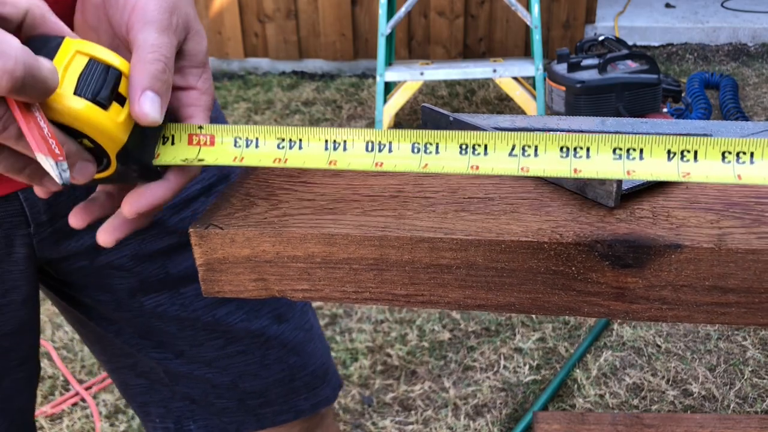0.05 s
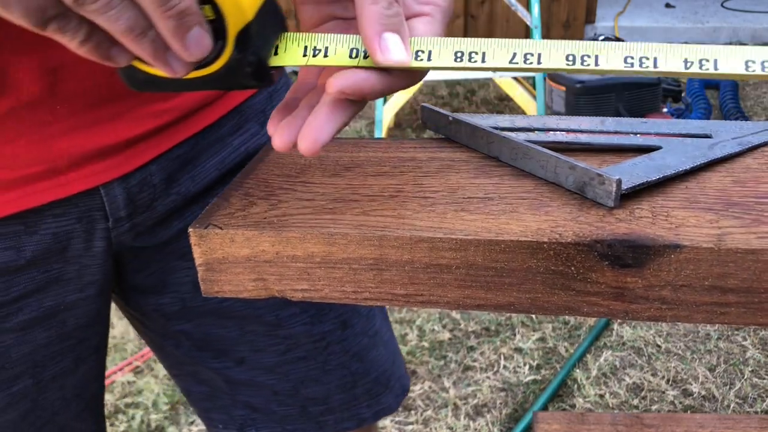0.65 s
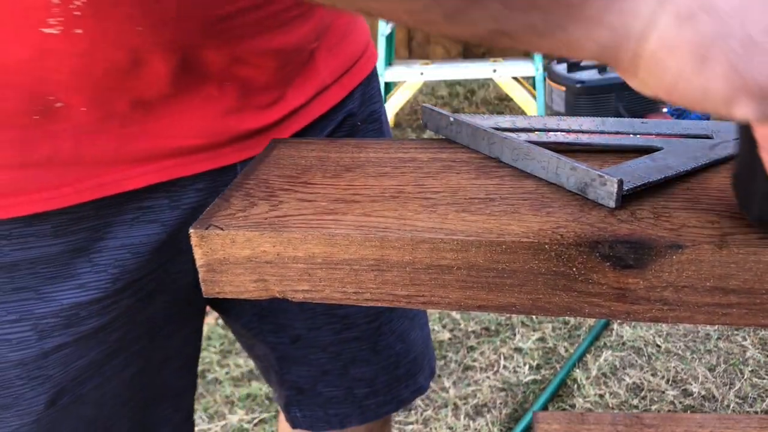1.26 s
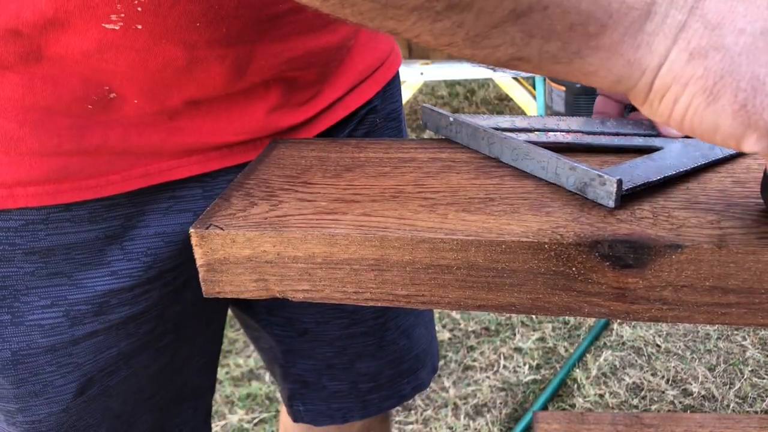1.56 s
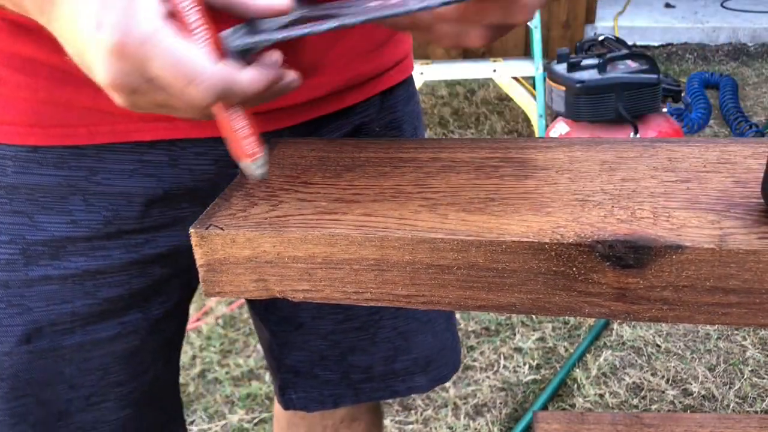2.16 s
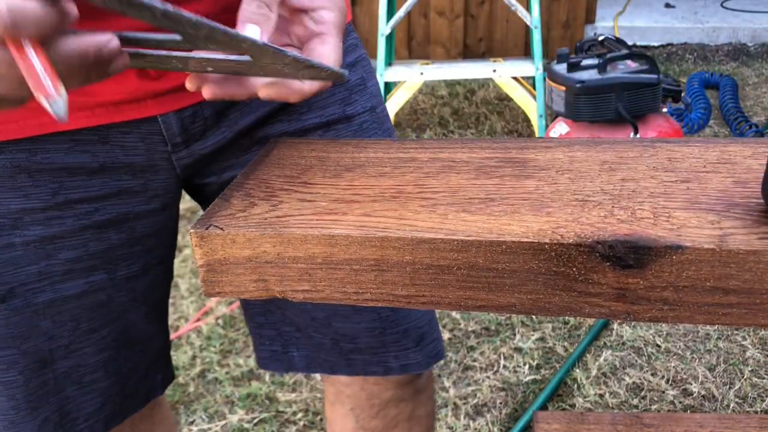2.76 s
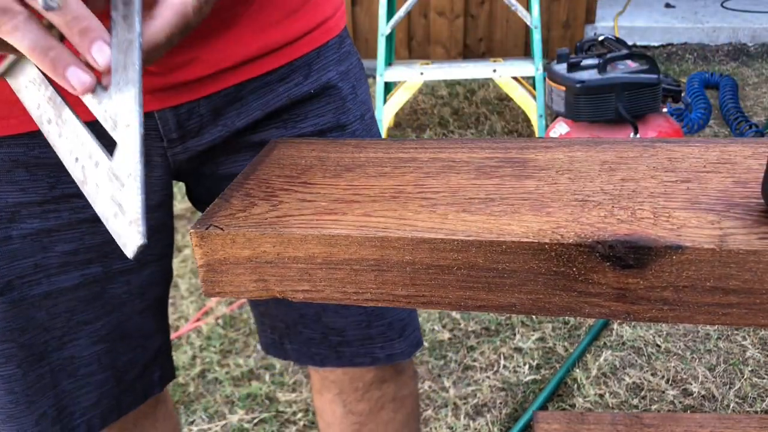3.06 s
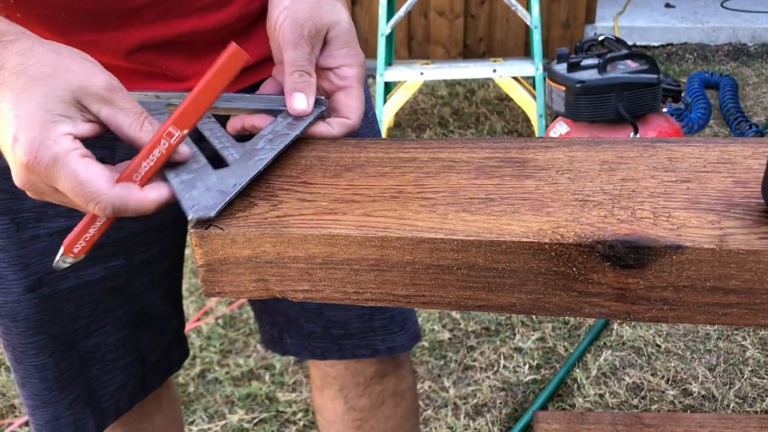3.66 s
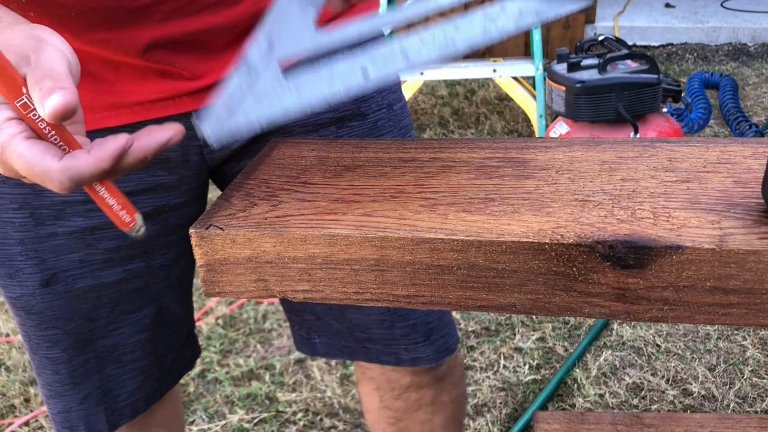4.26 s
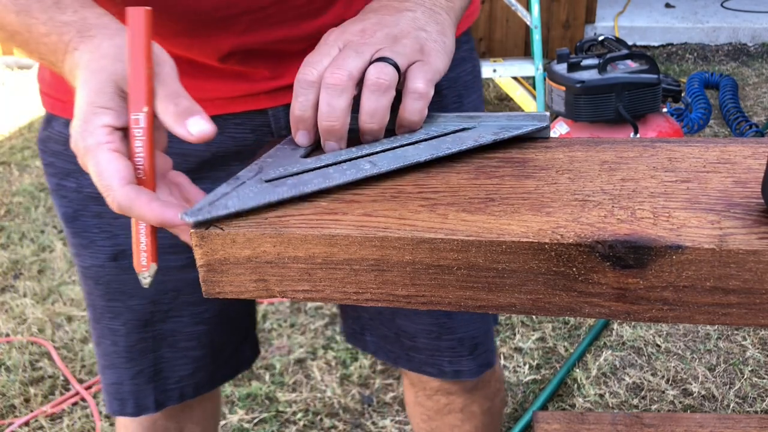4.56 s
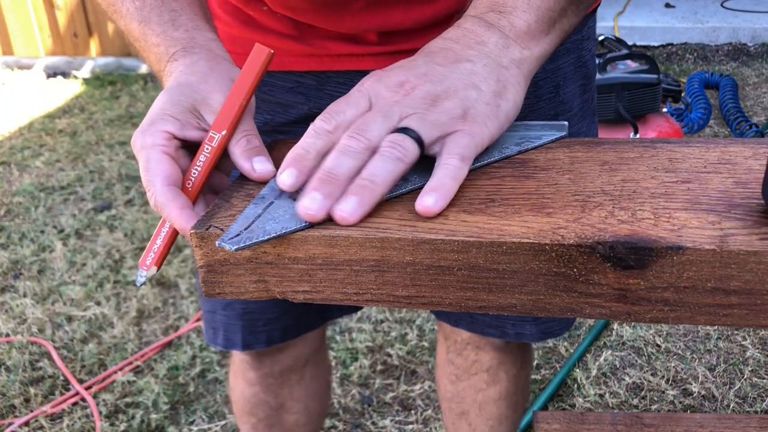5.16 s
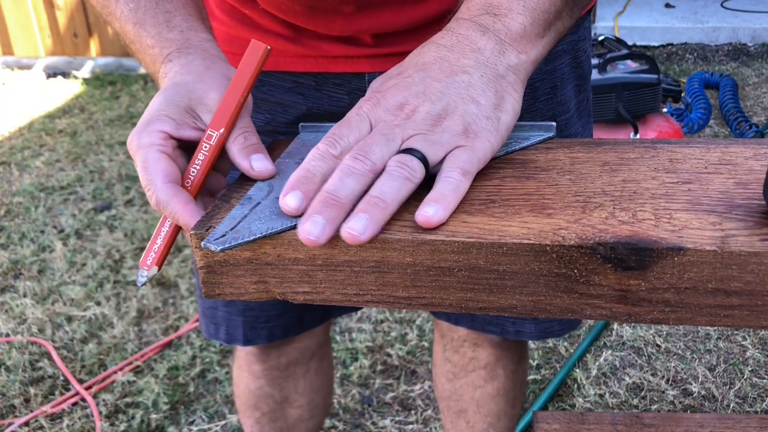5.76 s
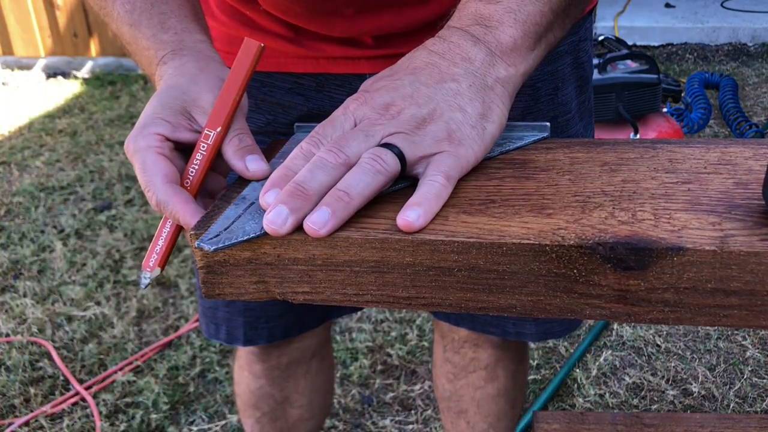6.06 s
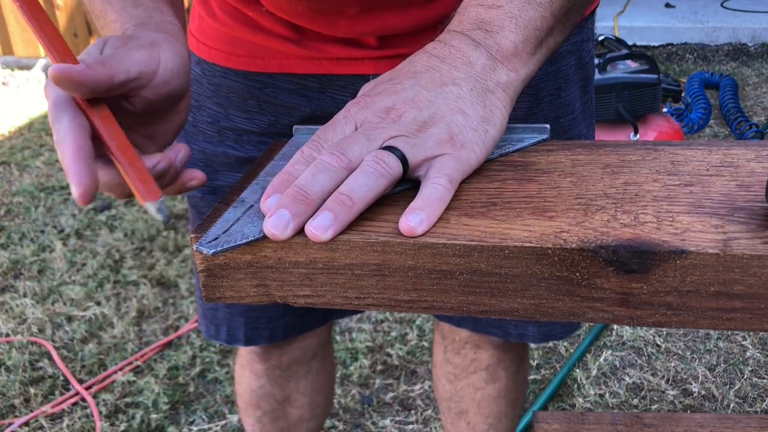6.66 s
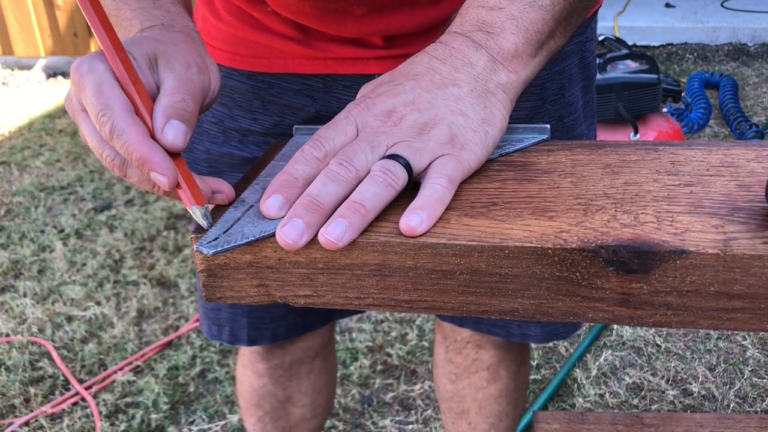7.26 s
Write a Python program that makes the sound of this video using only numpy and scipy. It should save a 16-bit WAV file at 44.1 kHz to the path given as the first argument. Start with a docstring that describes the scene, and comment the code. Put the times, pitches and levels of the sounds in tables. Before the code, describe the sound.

Outdoors in light wind, a tape measure zips back and snaps twice; a metal square is handled and clatters down on wood.

```python
"""A steel tape measure runs back into its case in two pulls, each ending in a clattering stop.
An aluminium square is picked up, rings faintly under the fingers, is dropped on a wooden board
and slid into place. A pencil starts a line. Knocks ring decaying modes; friction is grainy noise.
Outdoors, light wind rocks the microphone over a distant low rumble, and the yard echoes a little."""
import sys
import numpy as np
from scipy import signal
from scipy.fft import rfft, irfft
from scipy.io import wavfile
from scipy.ndimage import uniform_filter1d

SR = 44100
rng = np.random.default_rng(int(sys.argv[2]) if len(sys.argv) > 2 else 0)


def put_to_file(sound):
    """Save the sound as 16-bit audio at rate SR, in the file named by the first command-line argument."""
    columns = np.atleast_2d(sound).T  # one column per channel
    safe = np.clip(columns, -1, 1)
    whole_steps = np.round(safe * 32767)
    wavfile.write(sys.argv[1], SR, whole_steps.astype(np.int16))


N = 331381
TIME = np.arange(N) / SR


def amp(db):
    return 10 ** (np.asarray(db) / 20)


def unit_rms(x):
    return x / np.sqrt(np.mean(x ** 2) + 1e-30)


def log_interp(points, hz):
    """Interpolates (hz, value) points on a log-frequency axis."""
    point_hz, value = np.transpose(points)
    return np.interp(np.log(hz + 0.011), np.log(point_hz), value)


def add(mix, start_s, sound):
    part = mix[round(start_s * SR):][:len(sound)]
    part += sound[:len(part)]


def coloured(x, tone):
    """Filters x by (hz, gain_db) points; rms 1."""
    gain = amp(log_interp(tone, np.fft.rfftfreq(len(x), 1 / SR)))
    return unit_rms(irfft(rfft(x) * gain, len(x)))


def resonate(x, hz, width_hz):
    """Resonance at hz, constant or per sample; rms 1."""
    carrier = np.exp(2j * np.pi * np.cumsum(hz * np.ones(len(x))) / SR)
    pole = np.exp(-np.pi * width_hz / SR)
    return unit_rms((carrier * signal.lfilter([1], np.poly([pole, pole]), x / carrier)).real)


def grains(count, per_s, spread_db):
    """Tiny random slips of uneven size over a fine hiss."""
    slipping = rng.random(count) < per_s / SR
    size = amp(spread_db * np.minimum(rng.exponential(1, count), 4))
    hiss = rng.standard_normal(count)
    return unit_rms(np.sign(hiss) * size * slipping) + 0.44 * hiss


def rub(gain, tone, per_s, spread_db):
    """Friction: grains in a body's colour, following gain."""
    return gain * coloured(grains(N, per_s, spread_db), tone)


def burst(rise_s, t60_s):
    """0.5 s envelope: linear rise, exponential fall."""
    t = TIME[:SR // 2]
    return np.minimum(t / rise_s, 1) * amp(-60 * np.maximum(t - rise_s, 0) / t60_s)


def stroke(start_s, length_s, level_db, swell_db, attack_s, t60_s):
    """Gain of one movement: up 20 dB in the attack_s before start_s, changes by swell_db, decays."""
    t = TIME - start_s
    slope_db = swell_db * (np.clip(t / length_s, 0, 1) - .5)
    edges_db = 20 * np.maximum(-t, 0) / attack_s + 60 * np.maximum(t - length_s, 0) / t60_s
    return amp(level_db + slope_db - np.minimum(edges_db, 200))


def strokes(rows, **shape):
    """Movements summed in power."""
    return np.sqrt(sum(stroke(*row, **shape) ** 2 for row in rows))


def drive_db(hz, focus_hz):
    """A contact drives the modes near focus_hz hardest."""
    return -18 * np.log10(1 + np.log2(hz / focus_hz) ** 2 / 0.47)


def ring(hz, gain_db, t60_s, rise_s):
    """Decaying modes of alternating sign; rms 1 over the first 20 ms."""
    t = TIME[:SR // 2]
    sign = (-1) ** np.arange(len(hz))
    modes = amp(-60 * t / t60_s[:, None]) * np.sin(2 * np.pi * hz[:, None] * t)
    sound = (sign * amp(gain_db)) @ modes
    sound *= 1 - np.exp(-t / rise_s)
    return sound / np.std(sound[:SR // 50])


# wind pressure spectrum: freq_hz, gain_db
WIND_TONE = [(1, -10), (3, -0.5), (8, -2), (15, -32.5), (25, -30.5), (40, -38), (70, -54.5), (150, -78),
             (400, -100)]
# gusts: start_s, length_s, level_db
GUST_STROKES = [(0, 0.46, -24), (1.08, 0.67, -25.5), (2.98, 0.57, -32), (5.8, 0.77, -28.5),
                (6.8, 0.63, -26.5)]

def wind(calm_db=-45):
    """Slow pressure swings on the microphone."""
    pressure = coloured(rng.standard_normal(N), WIND_TONE)
    pressure /= np.sqrt(uniform_filter1d(pressure ** 2, SR // 2))
    gusts = strokes(GUST_STROKES, swell_db=0, attack_s=0.22, t60_s=1.6)
    return np.hypot(amp(calm_db), gusts) * pressure


# rumble and air spectrum: freq_hz, gain_db
RUMBLE_TONE = [(29, -38.5), (50, -5.5), (87, -2), (113, -5), (158, -6.5), (221, -19), (444, -30.5),
               (668, -27.5), (1740, -36.5), (3670, -45.5), (6530, -47.5), (15500, -61)]

def rumble(level_db=-61):
    """Steady distant low noise."""
    return amp(level_db) * coloured(rng.standard_normal(N), RUMBLE_TONE)


# blade runs: start_s, length_s, level_db, swell_db
BLADE_RUNS = [(.02, .04, -70, -3), (.1, 0.86, -82, -1), (.565, 0.096, -53, 11), (.7, 0.24, -75.5, -16),
              (.977, 0.099, -68, -12), (1.06, 0.21, -70, 8.5), (1.25, 0.095, -57, 6),
              (1.34, .15, -57.5, -9)]
# blade friction spectrum: freq_hz, gain_db
BLADE_TONE = [(200, -17), (500, -10), (1000, -3), (1500, -1.5), (2100, -1.5), (2750, -4.5), (4200, -5.5),
              (5300, -6.5), (6700, -8.5), (8300, -22), (15500, -32)]
TAPE_ATTACK_S = 0.026

def blade():
    """The blade hisses over its guide, louder with speed, softer when braked."""
    gain = strokes(BLADE_RUNS, attack_s=TAPE_ATTACK_S, t60_s=0.14)
    return rub(gain, BLADE_TONE, per_s=2000, spread_db=1)


# contacts of case, blade, pencil and square: start_s, level_db, centre_hz, width_oct, t60_s
CLICKS = [(0.036, -58.5, 3020, 1.9, 0.074), (.053, -44, 1910, 0.75, 0.018), (.498, -64, 3900, 0.47, 0.11),
          (0.6502, -29, 5500, 0.55, 0.014), (0.973, -58, 3150, 0.58, 0.062), (1.254, -57, 3000, 0.67, .015),
          (1.272, -56.5, 2300, 0.39, 0.022), (1.326, -51, 8000, 1, .015), (2.351, -58.5, 2300, 1, 0.022),
          (2.592, -57.5, 3750, 0.65, 0.012), (2.7865, -59, 1900, 1, 0.014),
          (4.4913, -44.5, 2670, 0.42, 0.036), (4.556, -38.5, 1890, 0.53, 0.038),
          (4.711, -51.5, 4200, 0.81, 0.01), (5.18, -65, 6670, 0.76, 0.018), (7.176, -72, 2300, 0.68, .02)]

def clicks(rise_s=0.000418):
    """Each contact is a short crack in one broad band."""
    out = np.zeros(N)
    hz = np.geomspace(100, 16000, 30)
    lowpass_db = -10 * np.log10(1 + (hz / 10000) ** 6)
    for start_s, level_db, centre_hz, width_oct, t60_s in CLICKS:
        band_db = -20 * np.log10(1 + (np.log2(hz / centre_hz) / width_oct) ** 2)
        crack = coloured(rng.standard_normal(SR // 2), np.c_[hz, band_db + lowpass_db])
        add(out, start_s, amp(level_db) * burst(rise_s, t60_s) * crack)
    return out


# brushing movements: start_s, length_s, level_db
SWISHES = [(.285, 0.025, -74.5), (.38, 0.091, -68), (.86, 0.33, -79.5), (1.445, .035, -74),
           (2.14, 0.14, -73.5), (2.36, 0.62, -79), (4.22, 0.17, -78.5), (4.85, 0.11, -67.5),
           (5.1, 0.31, -88)]
# skin and cloth spectrum: freq_hz, gain_db
SWISH_TONE = [(300, -14.5), (1500, -7.5), (4000, 0), (8500, -2.5), (11000, -7.5), (16000, -10)]

def swish():
    """Skin and cloth brush past."""
    gain = strokes(SWISHES, swell_db=3, attack_s=0.23, t60_s=0.24)
    return rub(gain, SWISH_TONE, per_s=3900, spread_db=0)


# coil resonances: centre_hz, width_hz, spin_db, run_on_db
COIL_BANDS = [(2130, 400, -56.5, -53), (3120, 480, -70, -50), (6600, 600, -62, -73)]

def coil(start_s=.562, stop_s=.651, run_on_delay_s=0.012, whine_from_hz=1430, whine_to_hz=1700):
    """Fast pull: the coil rasps in its case, whines higher with speed and runs on after the stop."""
    length_s = stop_s - start_s
    spin = stroke(start_s, length_s, level_db=0, swell_db=7.5, attack_s=TAPE_ATTACK_S, t60_s=.06)
    run_on = stroke(stop_s + run_on_delay_s, length_s=0.014, level_db=0, swell_db=0,
                    attack_s=TAPE_ATTACK_S, t60_s=0.29)
    rattle = grains(N, per_s=900, spread_db=3)
    rasp = sum((amp(spin_db) * spin + amp(run_on_db) * run_on) * resonate(rattle, hz, width_hz)
               for hz, width_hz, spin_db, run_on_db in COIL_BANDS)
    whine_hz = np.interp(TIME, [start_s, stop_s], [whine_from_hz, whine_to_hz])
    whine = resonate(rng.standard_normal(N), whine_hz, width_hz=110)
    whine *= stroke(start_s, length_s, level_db=-65, swell_db=22, attack_s=TAPE_ATTACK_S, t60_s=0.026)
    return rasp + whine


# case jolts: start_s, level_db, rise_s, t60_s, focus_hz
JOLTS = [(.651, -37, .003, 0.069, 433), (.658, -42, .002, 0.1, 760), (0.675, -46, 0.0019, 0.087, 800),
         (1.316, -42.5, .006, 0.17, 280)]
# case spectrum: freq_hz, gain_db
CASE_TONE = [(100, -6.5), (220, -6), (360, -2), (490, -4.5), (550, -13.5), (630, -0.5), (720, 0),
             (830, 2.5), (1200, -5), (2500, -32), (8000, -47)]

def case_jolts():
    """Each stop jolts the case in the hand."""
    out = np.zeros(N)
    for start_s, level_db, rise_s, t60_s, focus_hz in JOLTS:
        tone = [(hz, gain_db + drive_db(hz, focus_hz)) for hz, gain_db in CASE_TONE]
        thud = coloured(rng.standard_normal(SR // 2), tone)
        add(out, start_s, amp(level_db) * burst(rise_s, t60_s) * thud)
    return out


# blows to the blade: start_s, level_db, rise_s, t60_s, tilt_db_per_oct
BLADE_BLOWS = [(.668, -46, 0.0056, 0.18, -1.5), (.728, -61.5, 0.0064, 0.54, -9.5),
               (1.3043, -31.5, 0.0021, 0.065, 0.5), (1.322, -38.5, 0.0036, 0.16, -1),
               (1.465, -55, 0.0015, 0.23, -5)]
# loose blade spectrum: freq_hz, gain_db
CLATTER_TONE = [(200, -35), (800, -9), (1500, -2.5), (2070, 1.5), (2650, -3.5), (2820, 6), (3030, -2.5),
                (3340, 6.5), (3600, -3), (4200, 3.5), (4650, 0), (5000, -4.5), (6000, -5), (6300, -3.5),
                (7000, -7.5), (8500, -23), (15000, -31)]

def blade_clatter():
    """The loose blade chatters at each stop."""
    out = np.zeros(N)
    for start_s, level_db, rise_s, t60_s, tilt_db_per_oct in BLADE_BLOWS:
        tone = [(hz, gain_db + tilt_db_per_oct * np.log2(hz)) for hz, gain_db in CLATTER_TONE]
        chatter = coloured(grains(SR // 2, per_s=1800, spread_db=2.5), tone)
        add(out, start_s, amp(level_db) * burst(rise_s, t60_s) * chatter)
    return out


# modes of the square: pitch_hz, gain_db, t60_s
SQUARE_MODES = [(2589, 3, 0.18), (2724, -5, 0.18), (3047, -8, 0.2), (3281, -7, 0.17), (3612, -6, 0.26),
                (3774, -9, 0.28), (4021, -17, 0.55), (4334, -17, 0.17), (4854, -2, 0.15), (5561, -14, 0.25),
                (5846, -8, 0.26), (6030, -7, 0.18), (6388, -12, 0.18), (6660, -17, 0.22), (7072, -15, 0.17),
                (7590, -17, 0.3), (8020, -14, 0.18), (8430, -23, 0.22), (8928, -16, 0.17),
                (9783, -21, 0.18), (10065, -25, 0.18), (11120, -12, 0.17), (11536, -16, 0.17),
                (12161, -25, 0.17), (12938, -23, 0.2)]
# finger rubs: start_s, length_s, level_db, focus_hz, scratch_share
FINGER_RUBS = [(1.696, 0.068, -74, 6000, 0.8), (3.03, .03, -79, 9000, .3), (3.1, 0.026, -80, 5500, 0.5),
               (3.164, 0.036, -69, 7000, 0.1), (3.231, .03, -72, 6300, 0.07), (3.55, 0.07, -81.5, 6500, .5),
               (3.655, 0.019, -72.5, 7000, 0.15), (3.922, 0.066, -79, 5840, .2),
               (4.093, 0.04, -80, 6500, 0), (4.462, 0.14, -66.5, 6500, 0.6), (4.787, 0.017, -70, 6000, .6),
               (5.092, 0.056, -73, 4800, 0.6), (5.2, 0.015, -75, 9000, 0.45),
               (5.338, 0.063, -75.5, 6500, 0.7), (5.608, 0.068, -79.5, 6800, 0.4),
               (5.8, .035, -78.5, 4500, .75)]
# dry scratch spectrum: freq_hz, gain_db
FINGER_TONE = [(1000, -3), (2500, -5), (4000, -1.5), (6500, -4.5), (9000, -7), (15500, -16)]

def fingers(slip_count=500, slip_spread_db=5, slip_decay_s=.005, grip_detune=.014):
    """Stick-slip on the square: each slip wakes one mode, detuned by the grip, over a dry scratch."""
    hz = np.transpose(SQUARE_MODES)[0]
    touch = np.array([stroke(*row[:3], swell_db=-1, attack_s=0.075, t60_s=0.16) for row in FINGER_RUBS])
    focus_hz, scratch_share = np.transpose(FINGER_RUBS)[3:]
    weights = amp(drive_db(hz[:, None], focus_hz) + .5 * log_interp(FINGER_TONE, hz)[:, None])
    weights *= np.sqrt(1 - scratch_share) / np.linalg.norm(weights, axis=0)
    out = rub(np.sqrt(scratch_share) @ touch, FINGER_TONE, per_s=1700, spread_db=0.5)
    for mode_hz, weight in zip(hz, weights):
        ringing = np.zeros(N)
        for detune in grip_detune * rng.standard_normal(2):
            slips = np.zeros(N)
            slips[rng.integers(0, N, slip_count)] = amp(slip_spread_db * rng.standard_normal(slip_count))
            pole = np.exp((2j * np.pi * mode_hz * (1 + detune) - 1 / slip_decay_s) / SR)
            ringing += signal.lfilter([1], np.poly([pole, pole.conjugate()] * 2).real, slips + 1e-12)
        out += (weight @ touch) * unit_rms(ringing)
    return out


# slides: start_s, length_s, level_db
SLIDES = [(2.14, 0.23, -75.5), (2.22, 0.037, -71), (2.66, 0.27, -76), (4.23, 0.065, -74), (4.85, 0.06, -67),
          (4.948, 0.039, -58)]
# wood friction spectrum: freq_hz, gain_db
SLIDE_TONE = [(200, -10), (450, 1.5), (800, 5.5), (1200, 3.5), (2000, -5), (4000, -15), (10000, -30)]

def slide():
    """Hand, square and pencil slide on wood."""
    gain = strokes(SLIDES, swell_db=-3.5, attack_s=0.051, t60_s=0.056)
    return rub(gain, SLIDE_TONE, per_s=1600, spread_db=1)


# modes of the gripped square: pitch_hz, gain_db, t60_s
GRIPPED_MODES = [(2794, 2, 0.04), (3612, -12.5, 0.21), (6020, 2, .055), (6648, -9, 0.098)]

def lift_ping(start_s=2.351, level_db=-65):
    """Gripped tightly as it is lifted, the square gives one short ping."""
    out = np.zeros(N)
    add(out, start_s, amp(level_db) * ring(*np.transpose(GRIPPED_MODES), rise_s=.0005))
    return out


# hum curve: time_s, level_db, pitch_hz
HUM_CURVE = [(2.6, -110, 185), (3.3, -74, 199.9), (4, -73, 213.5), (4.7, -110, 218.4)]

def hum():
    """A faint distant hum swells and fades as its pitch rises."""
    time_s, level_db, pitch_hz = np.transpose(HUM_CURVE)
    drone = resonate(rng.standard_normal(N), np.interp(TIME, time_s, pitch_hz), width_hz=2.8)
    return amp(np.interp(TIME, time_s, level_db)) * drone


# squeaks: peak_s, level_db, pitch_hz, sigma_s
SQUEAKS = [(3.115, -70, 6460, .018), (3.195, -68, 6340, 0.015), (3.259, -64.5, 4820, 0.0079),
           (4.478, -61.5, 5550, 0.02), (4.809, -65.5, 6000, 0.018), (5.213, -73, 10100, 0.011),
           (5.805, -80, 4100, 0.013)]

def squeaks(waver_depth=.004):
    """A fingertip or the edge sticks and makes one mode of the square sing."""
    out = np.zeros(N)
    t = TIME[:SR // 5] - .1
    for peak_s, level_db, pitch_hz, sigma_s in SQUEAKS:
        waver = unit_rms(uniform_filter1d(rng.standard_normal(len(t)), SR // 200))
        cycles = np.cumsum(pitch_hz * (1 + waver_depth * waver)) / SR
        swell = np.exp(-.5 * (t / sigma_s) ** 2)
        add(out, peak_s + t[0], amp(level_db) * swell * np.sin(2 * np.pi * cycles))
    return out


# pencil taps: start_s, level_db
TICKS = [(3.399, -74), (3.432, -81), (3.442, -77), (3.489, -77.5), (3.533, -82), (3.558, -77.5)]
# modes of a tap: pitch_hz, gain_db, t60_s
TICK_MODES = [(3180, -6, 0.046), (3970, -4, .05), (4210, 3, .06), (6100, -7, .045), (7000, -10, .04),
              (8900, -4, 0.052), (11100, -11, 0.045)]

def pencil_ticks(spread_db=2.5, detune=.02):
    """The pencil rattles against the square in the same hand."""
    out = np.zeros(N)
    hz, mode_db, t60_s = np.transpose(TICK_MODES)
    for start_s, level_db in TICKS:
        contact_db = mode_db + spread_db * rng.standard_normal(len(hz))
        clink = ring(hz * rng.normal(1, detune, len(hz)), contact_db, t60_s, rise_s=.001)
        scuff = burst(rise_s=.001, t60_s=.06) * coloured(rng.standard_normal(SR // 2), FINGER_TONE)
        add(out, start_s, amp(level_db) * (clink + 2 * scuff))
    return out


# knocks on the metal: start_s, level_db, focus_hz, t60_factor
SQUARE_KNOCKS = [(4.364, -72, 7300, 0.25), (4.4925, -51.5, 5400, 1), (4.521, -67, 6300, 0.55),
                 (4.556, -50.5, 3740, 1), (4.611, -55.5, 3420, 0.97), (5.179, -76, 6500, 0.34)]

def square_rings():
    """Knocks ring the modes of the metal plate."""
    out = np.zeros(N)
    hz, mode_db, t60_s = np.transpose(SQUARE_MODES)
    for start_s, level_db, focus_hz, t60_factor in SQUARE_KNOCKS:
        clang = ring(hz, mode_db + drive_db(hz, focus_hz), t60_s * t60_factor, rise_s=0.00051)
        add(out, start_s, amp(level_db) * clang)
    return out


# modes of the board with the square on it: pitch_hz, gain_db, t60_s
BOARD_MODES = [(328, -4, 0.2), (433, -7.5, 0.24), (522, -11, 0.18), (613, -2.5, 0.16), (733, -4, 0.21),
               (800, -11, 0.12), (862, -3, 0.23), (954, -9, 0.23), (1043, -12, 0.2), (1136, -11, 0.17),
               (1261, -9, 0.17), (1443, -20, 0.25), (1531, -13, 0.2), (1613, -17.5, 0.18),
               (1755, -19.5, 0.18), (1893, -15, 0.17), (2073, -17, 0.17), (2330, -18, 0.11),
               (2460, -18, 0.11)]
# landings on the board: start_s, level_db, focus_hz, t60_factor
LANDINGS = [(4.364, -61, 606, 0.84), (4.397, -62.5, 496, 0.84), (4.4921, -39.5, 1230, 0.76),
            (4.521, -47, 1670, 1), (4.555, -37, 1300, 0.51), (4.5625, -32.5, 780, 0.89),
            (4.603, -45, 1530, 0.66), (4.611, -44.5, 1300, 0.55), (4.7102, -46, 1250, 0.77),
            (4.818, -50, 586, 0.6)]

def board_knocks(buzz_db=1.5):
    """The square lands edge by edge, corners high, flat face low; the faces buzz after each blow."""
    out = np.zeros(N)
    hz, mode_db, t60_s = np.transpose(BOARD_MODES)
    for start_s, level_db, focus_hz, t60_factor in LANDINGS:
        blow_db = mode_db + drive_db(hz, focus_hz)
        knock = ring(hz, blow_db, t60_s * t60_factor, rise_s=.5 / focus_hz)
        tone = [(120, blow_db[0] - 8), *zip(hz, blow_db), (7000, blow_db[-1] - 28)]
        buzz = coloured(grains(SR // 2, per_s=1500, spread_db=3), tone)
        buzz *= burst(rise_s=.0005, t60_s=.14 * t60_factor)
        add(out, start_s, amp(level_db) * (knock + amp(buzz_db) * buzz))
    return out


# pencil strokes: start_s, length_s, level_db
PENCIL_STROKES = [(6.985, 0.032, -71), (7.06, 0.047, -71.5), (7.17, 0.27, -84.5)]
# lead-on-wood spectrum: freq_hz, gain_db
PENCIL_TONE = [(200, -7), (480, 9), (700, -2), (1100, -16), (3000, -22), (9000, -43)]

def pencil_line():
    """Lead drags over the grain, easing off in each stroke."""
    gain = strokes(PENCIL_STROKES, swell_db=-4, attack_s=0.035, t60_s=0.14)
    return rub(gain, PENCIL_TONE, per_s=280, spread_db=4)


# yard decay: freq_hz, t60_s
ECHO_DECAY = [(200, 0.55), (1000, 0.46), (4000, 0.19), (12000, 0.17)]

def yard_echo(x, taps_per_s=2000, predelay_s=.012):
    """Scattered reflections off fence and house; highs die first."""
    taps = rng.standard_normal(SR) * (rng.random(SR) < taps_per_s / SR) * (TIME[:SR] > predelay_s)
    hz, t, bands = signal.stft(taps, SR, nperseg=256)
    decay = amp(-60 * t / log_interp(ECHO_DECAY, hz)[:, None])
    tail = signal.istft(bands * decay, SR, nperseg=256)[1]
    return signal.oaconvolve(x, tail / np.linalg.norm(tail))[:N]


def scene():
    """Close tape measure and work on the board, with echo and outdoor background; mono."""
    tape = blade() + blade_clatter() + case_jolts() + coil() + clicks()
    square = square_rings() + lift_ping() + pencil_ticks() + squeaks() + fingers()
    work = square + board_knocks() + swish() + slide() + pencil_line()
    outdoors = wind() + rumble() + hum()
    echo = yard_echo(amp(-17.5) * tape + amp(-23.5) * work)
    return (outdoors + tape + work + echo)[None]


CUTOFF_HZ = 15600

def record(dry):
    """Steep low-pass."""
    lowpass = signal.firwin(511, CUTOFF_HZ, window=("kaiser", 9), fs=SR)
    return signal.oaconvolve(dry, lowpass[None], "same")


dry = scene()
out = record(dry)
put_to_file(out)
```